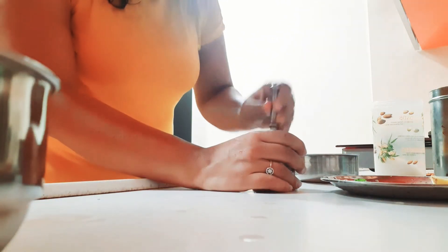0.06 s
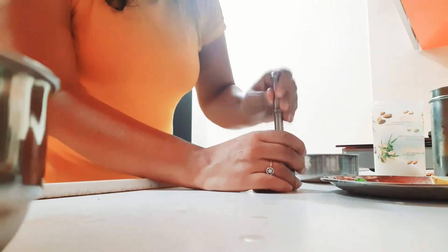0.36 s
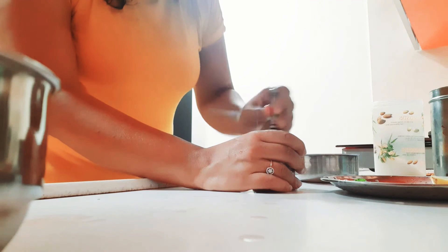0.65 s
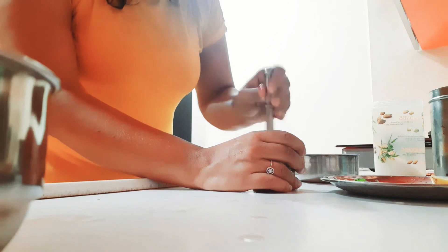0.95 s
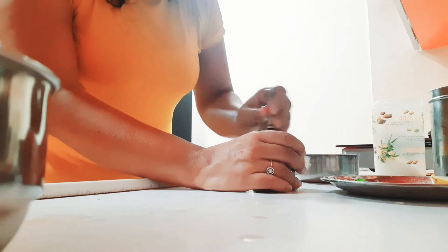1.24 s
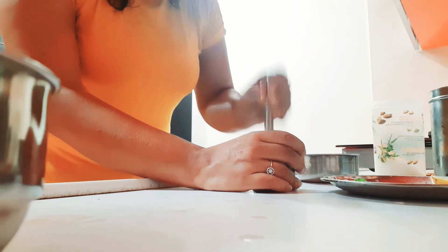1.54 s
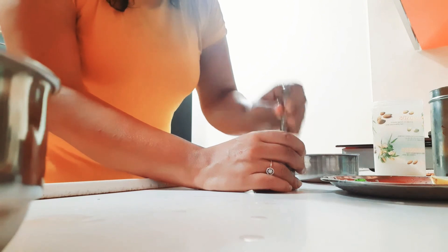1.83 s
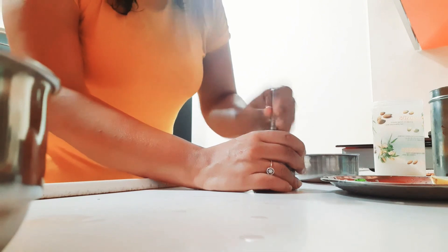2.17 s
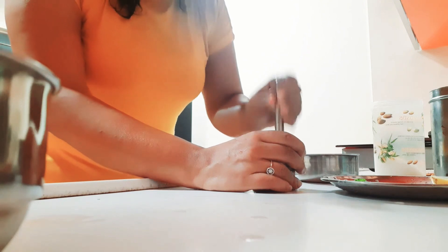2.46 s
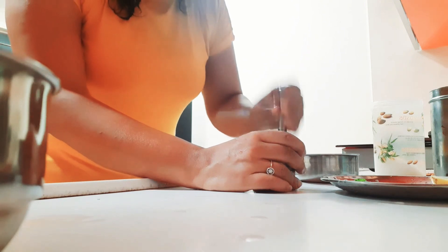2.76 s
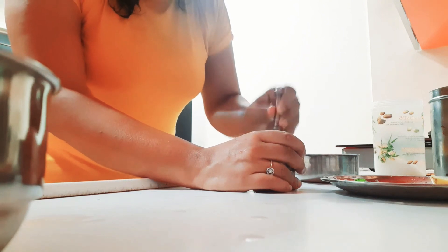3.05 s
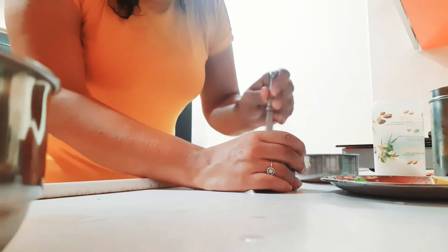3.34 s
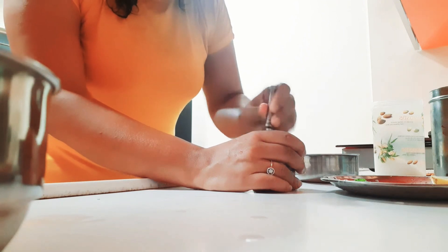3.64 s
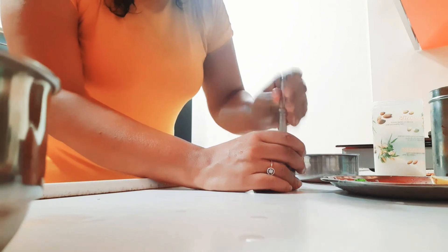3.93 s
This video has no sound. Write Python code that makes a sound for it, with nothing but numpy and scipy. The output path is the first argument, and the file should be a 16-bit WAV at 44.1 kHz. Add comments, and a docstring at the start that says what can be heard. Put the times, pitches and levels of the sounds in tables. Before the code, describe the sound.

A steel pestle pounds moist, crisp food in a small vessel, about five strokes a second. Short crunches mix with sharp clinks and occasional knocks on the table, ringing briefly in a kitchen over a low fan hum.

```python
"""Pestle pounding in a kitchen

A steel pestle pounds something moist and crisp in a small hand-held vessel, about five strokes a second.
Most strokes land in the food with a short crunch of tiny fractures; some catch the wall and clink,
and a few knock the vessel on the table. The hard-walled kitchen rings after each blow, over a fan's hum."""
import sys
import numpy as np
from scipy import signal
from scipy.fft import rfft, irfft, next_fast_len
from scipy.io import wavfile
from scipy.ndimage import map_coordinates

SR = 44100
rng = np.random.default_rng(int(sys.argv[2]) if len(sys.argv) > 2 else 0)


def store_pcm(level_fs):
    """Save levels as 16-bit WAV."""
    pcm = np.round(np.clip(level_fs, -1, 1) * 32767).astype(np.int16)
    wavfile.write(sys.argv[1], SR, np.atleast_2d(pcm).T)


N = 176400
EVENT_SAMPLES = 32768
T = np.arange(EVENT_SAMPLES) / SR


def amp(db):
    """Decibels to gain."""
    return 10 ** (np.asarray(db) / 20)


def unit_rms(x):
    """Scale to rms 1."""
    return x / np.sqrt(np.mean(x ** 2) + 1e-20)


def decay(t, t60):
    """Exponential decay, 60 dB down at t60."""
    return amp(-60 * t / t60)


def rise(tau_s):
    """Exponential attack."""
    return 1 - np.exp(-T / tau_s)


def swell(length_s):
    """Half-sine envelope."""
    return np.sin(np.pi * np.minimum(T / length_s, 1))


def log_interp(points, hz):
    """Interpolate (frequency, value) points on a log frequency axis."""
    freqs, values = np.transpose(points)
    return np.interp(np.log(hz + 1), np.log(freqs + 1), values)


def wobble(knots_per_s):
    """Smooth random curve."""
    return map_coordinates(rng.standard_normal(400), [np.arange(N) * knots_per_s / SR], mode='mirror')


def add(out, time_s, x):
    """Mix x in at time_s."""
    start = max(0, round(time_s * SR))
    out[:, start:start + x.shape[-1]] += x[..., :N - start]


def click(spectrum):
    """Minimum-phase pulse with this spectrum, peak 1."""
    hz = np.fft.rfftfreq(EVENT_SAMPLES, 1 / SR)
    cepstrum = irfft(np.log(amp(log_interp(spectrum, hz))))
    cepstrum[1:EVENT_SAMPLES // 2] *= 2
    cepstrum[EVENT_SAMPLES // 2 + 1:] = 0
    pulse = irfft(np.exp(rfft(cepstrum)))
    return pulse / np.abs(pulse).max()


def colour(x, spectrum):
    """Filter x through a unit-energy pulse with this spectrum."""
    pulse = click(spectrum)
    return signal.fftconvolve(x, pulse / np.linalg.norm(pulse))[:EVENT_SAMPLES]


def grains(spectrum, envelope, per_s=2500, spread_db=5):
    """Many tiny fractures or slips of uneven size under an envelope."""
    sizes = amp(spread_db * np.minimum(rng.exponential(size=EVENT_SAMPLES), np.pi))
    signs = rng.choice([-1, 1], EVENT_SAMPLES)
    fires = rng.random(EVENT_SAMPLES) < per_s / SR
    return colour(unit_rms(sizes * signs * fires) * envelope, spectrum)


def ring(modes, scatter_db, rattle_hz=0, rattles_per_s=350):
    """Damped modes, struck a little differently each time; a rattling contact wavers their pitch."""
    out = np.zeros(EVENT_SAMPLES)
    for hz, db, t60 in modes:
        waver = np.interp(T * rattles_per_s, np.arange(rattles_per_s), rng.standard_normal(rattles_per_s))
        cycles = hz * T + rattle_hz * np.cumsum(waver) / SR
        gain = amp(db + scatter_db * rng.standard_normal())
        out += gain * decay(T, t60) * np.cos(2 * np.pi * cycles)
    return out


# room decay: (frequency [Hz], t60 [s])
ROOM_T60 = [(100, 0.069), (500, 1), (1500, 0.61), (3000, 0.53), (8000, 0.49), (15000, 0.43)]
def kitchen(x, near_db, wet_db, near_t60_s=0.017):
    """Direct sound, quick scatter from hand, table and dishes, then the room's tail."""
    hz, t, bands = signal.stft(rng.standard_normal((2, EVENT_SAMPLES)), SR, nperseg=256)
    bands = bands * decay(t, log_interp(ROOM_T60, hz)[:, None])
    tail = signal.istft(bands, SR)[1][:, :EVENT_SAMPLES] * rise(0.004)
    near = rng.standard_normal((2, EVENT_SAMPLES)) * decay(T, near_t60_s)
    response = (amp(near_db) * unit_rms(near) + amp(wet_db) * unit_rms(tail)) / np.sqrt(EVENT_SAMPLES)
    response[:, 0] += 1  # direct path
    return signal.fftconvolve(x[None], response, axes=1)[:, :EVENT_SAMPLES]


# air noise: (frequency [Hz], level [dB])
AIR_SPECTRUM = [(25, -29), (50, -25.5), (78, -1), (193, -3), (399, -7.5), (482, -19.5), (631, -10),
                (970, -18.5), (1140, -27), (1490, -20.5), (2120, -33), (3000, -30.5), (3930, -28.5),
                (5010, -28.5), (9300, -41.5), (15500, -34.5)]
# left-right likeness of the air: (frequency [Hz], correlation [ratio])
AIR_CORRELATION = [(60, 0.99), (250, 0.92), (600, 0.18), (1500, 0.027), (8000, 0.019)]
# motor tones: (frequency [Hz], level [dB])
MOTOR_TONES = [(100.5, -47), (155, -55), (206, -51), (721, -73), (943, -68.5), (1419, -68)]
def fan(air_db=-42.5, swell_db=1.3, waver_db=3.5):
    """Low rushing air with wavering motor tones."""
    hz = np.fft.rfftfreq(N, 1 / SR)
    width_rad = np.arccos(np.clip(log_interp(AIR_CORRELATION, hz), -1, 1)) / 2
    spectra = rfft(rng.standard_normal((2, N))) * amp(log_interp(AIR_SPECTRUM, hz))
    mid, side = irfft(spectra * [np.cos(width_rad), np.sin(width_rad)], N)
    air = amp(air_db + swell_db * wobble(5)) * unit_rms(np.array([mid + side, mid - side]))
    t = np.arange(N) / SR
    hum = np.zeros(N)
    for tone_hz, db in MOTOR_TONES:
        rms = amp(db + waver_db * wobble(7.07))
        hum += np.sqrt(2) * rms * np.sin(2 * np.pi * tone_hz * t + wobble(13))
    return air + hum


# vessel rubbing the table: (frequency [Hz], level [dB])
RUB_SPECTRUM = [(100, -14), (350, 2.5), (620, 3), (1000, -9), (2500, -46)]
def slide(time_s=0.8, length_s=0.15, db=-47.5):
    """The vessel shifts on the table with a soft rub."""
    out = np.zeros((2, N))
    rub = amp(db) * grains(RUB_SPECTRUM, swell(length_s))
    add(out, time_s, kitchen(rub, near_db=0, wet_db=-1))
    return out


# pestle slides along the wall: (time [s], level [dB], length [s])
WALL_SCRAPES = [(2.4, -35.5, 0.021), (2.768, -40, 0.013), (3.639, -32.5, 0.015), (3.829, -37.5, 0.042),
                (3.895, -31, 0.022)]
# steel friction: (frequency [Hz], level [dB])
SCRAPE_SPECTRUM = [(300, -5.5), (2300, -10), (3000, 1), (4200, 0), (5800, -15), (7000, -3.5), (7700, 0),
                   (9500, -27), (12500, -8), (13900, -1), (16000, -12)]
def scrapes():
    """Steel rubs on the wall: a short swell of tiny slips."""
    out = np.zeros((2, N))
    for time_s, db, length_s in WALL_SCRAPES:
        slips = amp(db) * grains(SCRAPE_SPECTRUM, swell(length_s))
        add(out, time_s, kitchen(slips, near_db=4.5, wet_db=-1.5))
    return out


# cavity resonances: (time [s], pitch [Hz], level [dB])
CAVITY_POPS = [(0.554, 1673, -36), (0.753, 1783, -32.5), (0.95, 1863, -36), (1.349, 1843, -32),
               (2.136, 1805, -37), (2.724, 1870, -33.5), (2.727, 1458, -28.5), (2.956, 1394, -36)]
def pops(octave_db=-1, t60_s=0.04):
    """The vessel's hollow rings as the pestle plunges in; the covering hand sets the pitch."""
    out = np.zeros((2, N))
    for time_s, hz, db in CAVITY_POPS:
        phase = 2 * np.pi * hz * T
        tones = np.sin(phase) + amp(octave_db) * np.sin(2 * phase)
        add(out, time_s, kitchen(amp(db) * tones * decay(T, t60_s), near_db=-3.5, wet_db=-1))
    return out


# deep thumps: (time [s], level [dB])
DEEP_THUMPS = [(0.1018, -21), (1.494, -12.5), (2.28, -29)]
def thumps(end_hz=46, sag_hz=138, sag_s=0.005, t60_s=0.115):
    """A few deep cycles sink in pitch under some hard clinks, left of centre."""
    out = np.zeros((2, N))
    cycles = np.cumsum(end_hz + sag_hz * np.exp(-T / sag_s)) / SR
    thump = -np.cos(2 * np.pi * cycles) * decay(T, t60_s) * rise(0.00051)
    for time_s, db in DEEP_THUMPS:
        add(out, time_s, amp(db) * thump)
    return out * amp([[2.5], [-2.5]])


# vessel hits the table: (time [s], boom [dB], clack [dB])
TABLE_KNOCKS = [(.355, -28.5, -53), (.413, -37, -74), (1.742, -35, -51), (1.939, -40, -64),
                (2.140, -40, -60), (2.4912, -56, -44.5), (2.528, -22, -34), (3.902, -50, -38),
                (3.927, -20.5, -25)]
# table top: (frequency [Hz], level [dB], t60 [s])
TABLE_MODES = [(89, -44, 0.26), (202.8, 1, 0.21), (242.5, 2.5, 0.14), (326.6, -7.5, 0.19),
               (354, -6.5, 0.19), (386.3, -7, 0.23)]
# vessel's foot: (frequency [Hz], level [dB], t60 [s])
FOOT_MODES = [(558, -7, 0.14), (607, -2.5, 0.074), (733, 4, 0.033), (890, -4, 0.071), (948, -4.5, 0.035),
              (1190, -1.5, .04), (1556, -11, 0.084)]
# foot chatter: (frequency [Hz], level [dB])
CHATTER_SPECTRUM = [(30, -50), (150, -18), (400, -7), (580, 0), (950, 1), (1300, -7), (1800, -19),
                    (3000, -26), (9000, -55)]
def knocks(clunk_db=2.5, chatter_t60_s=0.046):
    """The vessel's foot lands with a clunk and chatters down; the table top booms."""
    out = np.zeros((2, N))
    for time_s, boom_db, clack_db in TABLE_KNOCKS:
        boom = ring(TABLE_MODES, scatter_db=0.5) * rise(0.0024)
        clunk = amp(clunk_db) * ring(FOOT_MODES, scatter_db=1.2) * rise(0.00075)
        chatter = grains(CHATTER_SPECTRUM, decay(T, chatter_t60_s))
        add(out, time_s, kitchen(amp(boom_db) * boom, near_db=-11, wet_db=-12))
        add(out, time_s, kitchen(amp(clack_db) * (clunk + chatter), near_db=0, wet_db=0))
    return out


# pestle reaches the bottom: (time [s], level [dB])
BOTTOM_TAPS = [(.3552, -24.5), (0.4134, -33), (0.7522, -19), (0.8135, -36), (0.948, -34), (1.035, -31.5),
               (1.1484, -24), (1.3479, -17.5), (1.7382, -24), (1.7986, -31), (2.1326, -21), (2.1387, -16),
               (2.395, -24), (3.019, -27.5), (3.228, -34), (3.537, -26), (3.615, -30)]
# damped contact: (frequency [Hz], level [dB])
TAP_SPECTRUM = [(150, 5), (1200, -40), (1850, -5), (2350, -5), (3000, -0.5), (3600, 10), (4700, 5),
                (6200, -8), (7500, -5.5), (10000, -40), (16000, -40)]
def taps():
    """Contacts with the vessel's bottom, damped by the food."""
    out, pulse = np.zeros((2, N)), click(TAP_SPECTRUM)
    for time_s, db in BOTTOM_TAPS:
        add(out, time_s, kitchen(amp(db) * pulse, near_db=3, wet_db=-5))
    return out


# strokes into the food: (time [s], pulp [dB], fizz [dB], nominal length [s])
FOOD_STROKES = [(0.344, -44, -45, 0.12), (0.355, -34.5, -47, 0.015), (0.555, -36, -37.5, 0.04),
                (0.755, -34.5, -30, 0.018), (0.952, -30.5, -30, 0.039), (1.152, -48.5, -34, 0.041),
                (1.3502, -35, -38, 0.064), (1.544, -52, -25, 0.038), (1.738, -44, -47.5, 0.1),
                (1.938, -45.5, -49.5, 0.07), (2.135, -38.5, -40.5, 0.059), (2.333, -34, -36, 0.077),
                (2.52, -36, -38.5, 0.073), (2.722, -31, -38, 0.073), (2.953, -42, -44.5, 0.13),
                (3.028, -38, -39.5, 0.029), (3.166, -36.5, -26.5, 0.056), (3.358, -38, -41, 0.079),
                (3.54, -37.5, -33.5, 0.07), (3.715, -29, -43, 0.12), (3.922, -34, -35.5, 0.068)]
# moist pulp: (frequency [Hz], level [dB])
PULP_SPECTRUM = [(30, -15), (200, -9), (1100, 1.5), (1780, 2.5), (2400, -9), (2900, -0.5), (3600, 1),
                 (5200, -12), (7400, -5.5), (9000, -30), (16000, -3)]
# crisp fizz: (frequency [Hz], level [dB])
FIZZ_SPECTRUM = [(500, -18.5), (4000, 0.5), (7000, -2), (9500, -8), (11700, 2), (13700, -2), (16000, -6)]
def crushes(lead_s=0.06, squeeze_db=-12, squeeze_extra_s=0.028):
    """The food is squeezed with a rising rustle, then gives way in a crunch."""
    out = np.zeros((2, N))
    from_peak_s = np.abs(T - lead_s)
    for time_s, pulp_db, fizz_db, length_s in FOOD_STROKES:
        squeeze = amp(squeeze_db) * decay(from_peak_s, length_s + squeeze_extra_s)
        collapse = decay(from_peak_s, length_s * np.where(T < lead_s, 0.36, 1.19))  # fast up, slow down
        pulp = amp(pulp_db) * grains(PULP_SPECTRUM, squeeze + collapse)
        fizz = amp(fizz_db) * grains(FIZZ_SPECTRUM, squeeze + collapse)
        add(out, time_s - lead_s, kitchen(pulp + fizz, near_db=3, wet_db=-2))
    return out


# steel hits the wall: (time [s], contact [dB], ring [dB], crack [dB], ring tilt [dB/octave])
WALL_CLINKS = [(0.0974, 0.5, -33, -14.5, -2), (0.1019, -38, -18.5, -22.5, 1), (1.4923, -7, -27.5, -9.5, 2),
               (1.4990, -40, -19.5, -27.5, 2), (2.2753, -2.5, -34, -20.5, -9), (2.2771, -38, -21, -47, 3.5),
               (2.4913, -3, -26.5, -33, -3.5), (2.7137, -23.5, -56, -59, -4), (3.351, -21, -41.5, -29, 4),
               (3.6724, -29, -45, -60, 3), (3.7112, -7.5, -25.5, -48, -2), (3.7174, -10, -32, -33, -11),
               (3.9017, -2, -24, -35, -2)]
# hard contact: (frequency [Hz], level [dB])
CONTACT_SPECTRUM = [(100, -53), (500, -45), (1100, -5), (2000, -34), (2450, -16), (2950, 8), (3550, -2),
                    (4300, 3), (4900, -8), (6000, -32), (7700, -6.5), (9500, -39), (14000, -34),
                    (16000, -50)]
# crack burst: (frequency [Hz], level [dB])
CRACK_SPECTRUM = [(30, -33), (250, 3.5), (800, -5.5), (1450, 0.5), (2300, -16.5), (4300, 7.5), (6200, -3),
                  (8000, -6.5), (10500, -14), (13700, -6), (16000, -17)]
# hand-damped pestle: (frequency [Hz], level [dB], t60 [s])
PESTLE_MODES = [(2630, -21, 0.079), (2777, -9, 0.11), (2962, 1, 0.054), (3230, -12, 0.032),
                (4153, -7, 0.034), (4590, -11, 0.032), (7140, -13.5, 0.036), (7705, 4.5, 0.028),
                (7887, 0, 0.026), (12200, -32, 0.025), (13800, -17, 0.026)]
def clinks(crack_t60_s=0.0095):
    """A hard contact, a brief crack and the pestle's ring; the spot struck sets the ring's brightness."""
    out, contact = np.zeros((2, N)), click(CONTACT_SPECTRUM)
    lowest_hz = PESTLE_MODES[0][0]
    for time_s, contact_db, ring_db, crack_db, tilt in WALL_CLINKS:
        burst = rng.standard_normal(EVENT_SAMPLES) * decay(T, crack_t60_s)
        crack = amp(crack_db) * colour(burst, CRACK_SPECTRUM)
        modes = [(hz, db + tilt * np.log2(hz / lowest_hz), t60) for hz, db, t60 in PESTLE_MODES]
        steel = amp(ring_db) * ring(modes, scatter_db=0.5, rattle_hz=55) * rise(0.00061)
        add(out, time_s, kitchen(amp(contact_db) * contact, near_db=-0.5, wet_db=-12, near_t60_s=0.011))
        add(out, time_s, kitchen(steel + crack, near_db=1, wet_db=3.5))
    return out


def scene():
    """Pounding and fan slightly to the right, thumps to the left."""
    pounding = clinks() + scrapes() + slide() + crushes() + pops() + taps() + knocks()
    return (pounding + fan()) * amp([[-0.85], [0.85]]) + thumps()


def record(dry, cutoff_hz=15900):
    """Clip at full scale, then brick-wall low-pass."""
    size = next_fast_len(N + EVENT_SAMPLES)
    passband = np.fft.rfftfreq(size, 1 / SR) < cutoff_hz
    return irfft(rfft(np.clip(dry, -1, 1), size) * passband, size)[:, :N]


dry = scene()
out = record(dry)
store_pcm(out)
```